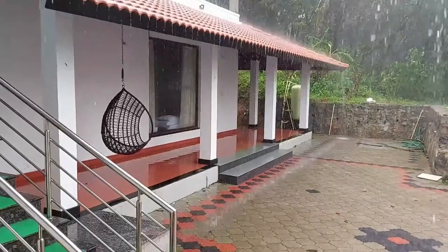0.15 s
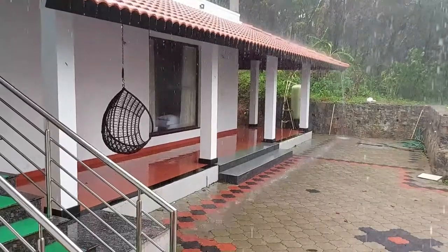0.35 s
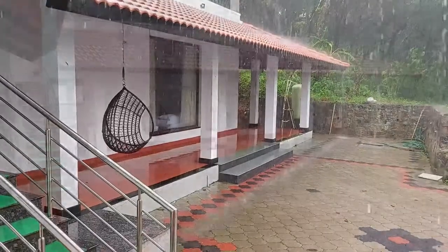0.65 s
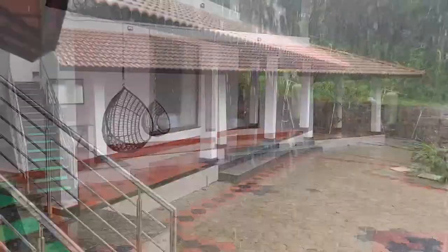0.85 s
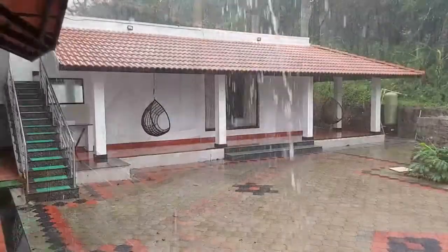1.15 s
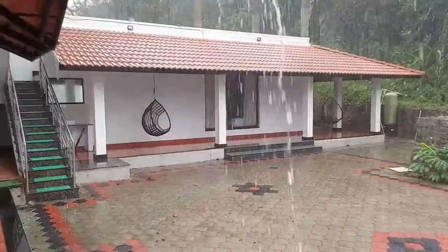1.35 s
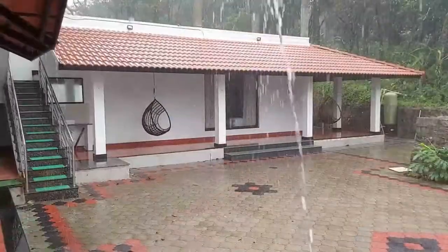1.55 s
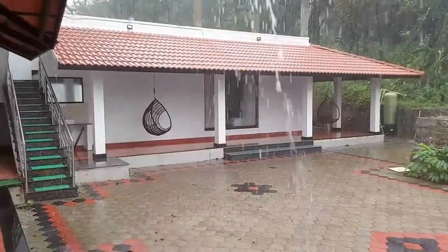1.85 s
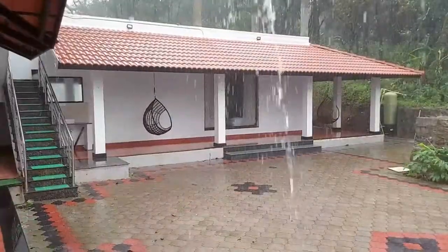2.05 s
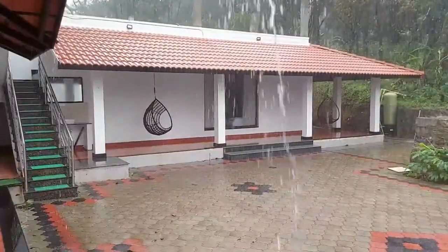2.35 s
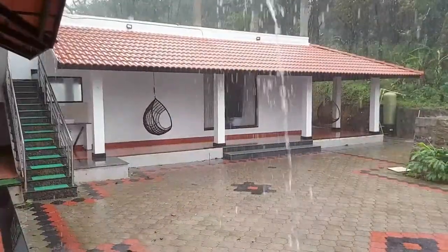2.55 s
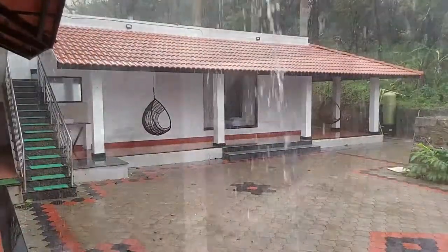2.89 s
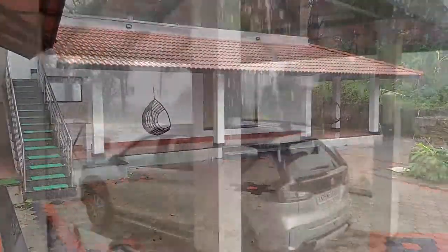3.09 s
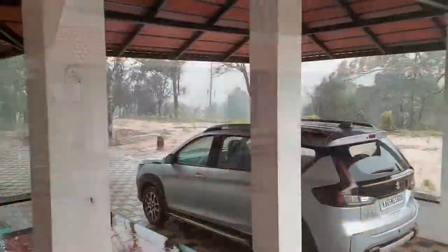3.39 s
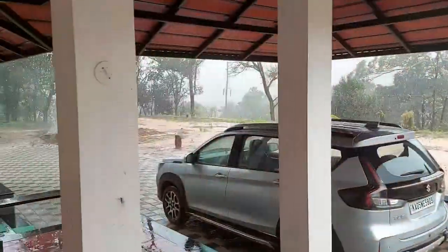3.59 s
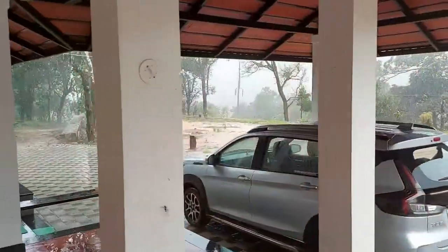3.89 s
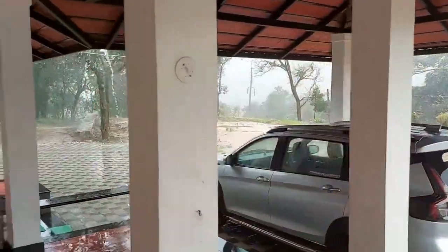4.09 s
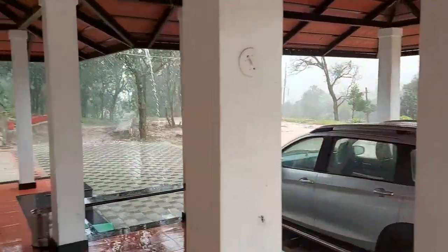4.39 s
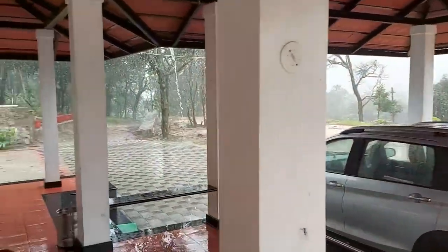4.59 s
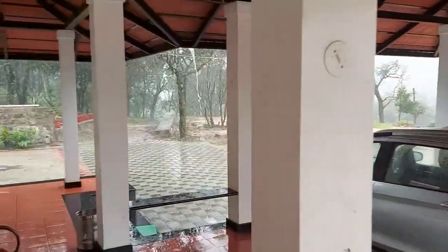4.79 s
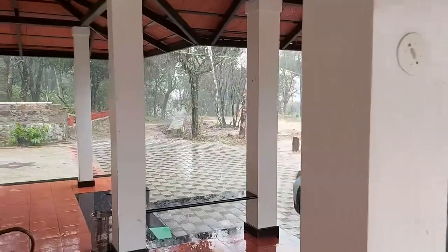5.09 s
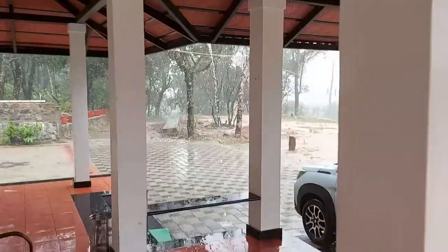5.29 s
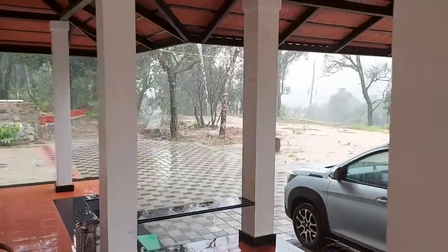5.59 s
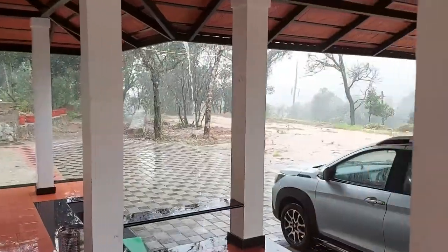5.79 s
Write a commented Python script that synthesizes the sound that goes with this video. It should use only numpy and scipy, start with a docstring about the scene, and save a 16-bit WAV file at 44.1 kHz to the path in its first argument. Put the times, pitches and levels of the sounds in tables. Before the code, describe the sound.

Dense steady monsoon rain beside a veranda cuts briefly to silence, then splashy roof runoff in a windy yard melts into a dripping porch.

```python
"""Dense, even monsoon rain beside a veranda; the sound sinks and drops out briefly, and the scene changes to a
paved yard that melts into a tiled porch. Noise stands for the wash of countless far drops; nearer drops are
short rings and sprays of noise at random times. Roof water splats in the yard; drips plink into puddles round
the porch, and tiles knock overhead. After the silence, gusts of low noise buffet the two microphones of a
phone, a hand's width apart."""
import sys
import numpy as np
from scipy import signal
from scipy.fft import rfft, irfft
from scipy.io import wavfile
from scipy.ndimage import uniform_filter1d

SR = 44100
rng = np.random.default_rng(int(sys.argv[2]) if len(sys.argv) > 2 else 0)


def unload_wav(signal):
    """Save mono or channel-first audio to the path in sys.argv[1] as 16-bit WAV at rate SR, clipped to [-1, 1]."""
    wavfile.write(
        sys.argv[1],
        SR,
        np.round(np.clip(np.atleast_2d(signal).T, -1, 1) * 32767).astype(np.int16),
    )


N = 261954
TIME = np.arange(N) / SR
FREQ = np.arange(N // 2 + 1) * SR / N
PORT_LAG_S = .00043  # travel time of sound from one microphone to the other


def veranda(far, near):
    """Dense, even rain on the paving, which surges once."""
    # Colour of the rain beside the veranda. Each row: frequency in Hz, relative level in dB.
    veranda_colour = [(30, -17), (50, -8), (85, 0.5), (160, -2.5), (380, -6), (560, -4.5), (800, -5.5),
                      (1200, -6.5), (1900, -5.5), (4200, -5), (5600, -7.5), (7000, -7.5), (8500, -11),
                      (15000, -11.5)]
    # Lean of the sound. Each row: frequency in Hz, left minus right in dB.
    veranda_lean = [(300, 0), (1300, 2), (2300, -3), (4400, -2.5), (6500, -4), (8500, 2.5), (11000, -2.5),
                    (15000, -3)]
    downpour = rain(far + undb(-7.0) * near, veranda_colour, level_db=-26.5)
    return lean(downpour, veranda_lean) * swell(centre_s=0.59, width_s=0.064, db=1.5)


def yard(far, near):
    """Coarser rain, with a rope of roof water breaking on the stones."""
    # Colour of the rain in the yard. Each row: frequency in Hz, relative level in dB.
    yard_colour = [(80, -7), (300, -4), (450, -7), (750, -4.5), (1250, -6), (1650, -3.5), (2100, -1.0),
                   (2500, -4.5), (2950, -3), (3800, -4), (5600, -7), (7000, -6.5), (8300, -11),
                   (15000, -11)]
    # Lean of the sound. Each row: frequency in Hz, left minus right in dB.
    yard_lean = [(300, -1), (1400, 2), (2100, -1), (3000, -7), (4400, -4), (6300, -0.5), (8500, 5),
                 (11000, 6), (15000, -0.5)]
    # Biggest splats from the eaves. Each row: start in seconds, relative peak in dB, ring in Hz.
    big_splats = [(1.0944, -22, 3420), (1.1722, -19, 2040), (1.1987, -20, 3830), (1.2803, -15, 2850),
                  (1.3277, -13.5, 2900), (1.3897, -14.5, 2900), (1.4591, -22, 2210), (1.5324, -15, 3170),
                  (1.701, -19, 2840), (1.7404, -13.5, 2120), (1.7943, -13, 2960), (1.8687, -15.5, 1990),
                  (1.9758, -10, 4350), (2.0552, -13, 2360), (2.0981, -16, 2670), (2.3334, -21, 2990),
                  (2.3808, -15.5, 3000), (2.6857, -13, 2930), (3.025, -16, 3000)]

    # the spatter slackens once
    flow = swell(centre_s=2.2, width_s=0.059, db=-8.5)
    rope = bubbles(rate=110, cycles=3.8, low_hz=1790, high_hz=4450)
    drops = flow * (undb(0.5) * near + undb(-12.0) * rope)

    big = undb(3.5) * splashes(big_splats, cycles=2.6, crack_db=-4, rebound_db=-17, bearing=0.046)
    small = flow * splashes(lesser_splats(), cycles=2.5, crack_db=2, rebound_db=-23, bearing=0.054)
    runoff = echo(big + small, wet_db=-2, t60_s=0.046)
    return lean(rain(far + drops, yard_colour, level_db=-28) + runoff, yard_lean)


def porch(far, near):
    """Rain beyond the pillars and on the tiles overhead; drips plink into puddles and ring under the roof."""
    # Colour of the rain from the porch. Each row: frequency in Hz, relative level in dB.
    porch_colour = [(60, -29), (150, -20), (230, -1.5), (380, -3), (550, 0.5), (800, -4), (1200, -7),
                    (1800, -3), (2900, -4.5), (3800, -1.4), (5800, -6.5), (7000, -6), (8300, -10),
                    (15000, -9.5)]
    # Lean of the sound. Each row: frequency in Hz, left minus right in dB.
    porch_lean = [(300, 0.17), (2400, -0.43), (15000, -0.12)]
    # Drips into the puddles. Each row: start in seconds, relative peak in dB, ring in Hz.
    drip_rows = [(3.6436, -18, 4440), (3.8032, -10.5, 3700), (3.967, -14, 4230), (4.335, -18, 3660),
                 (4.4388, -19, 1740), (4.8997, -11.5, 3750), (5.4513, -11, 5480), (5.5318, -18, 3450),
                 (5.6879, -21.5, 1310), (5.878, -21, 3920)]

    puddles = bubbles(rate=170, cycles=13, low_hz=1416, high_hz=6100)
    drops = echo(undb(-.5) * near + undb(-12) * puddles, wet_db=0.5, t60_s=0.06)
    outside = rain(far + drops, porch_colour, level_db=-30)

    drips = undb(2.0) * splashes(drip_rows, cycles=5.3, crack_db=-8, rebound_db=-9.5, bearing=.45)
    drips = echo(drips, wet_db=-3, t60_s=.16)
    return lean(outside + drips + undb(-46.0) * roof(), porch_lean)


def splashes(rows, cycles, crack_db, rebound_db, bearing, crack_s=0.00054):
    """Big drops: a crack and a short ring, then a smaller drop a moment away."""
    out = np.zeros((2, N))
    t = np.arange(SR // 50) / SR
    for start, db, hz in rows:
        crack = undb(crack_db) * rng.standard_normal(len(t)) * np.exp(-t / crack_s)
        hit = ring(hz, cycles) + crack
        # the hit falls a millisecond after the listed start
        add(out, start + 0.001026, undb(db) * hit / np.abs(hit).max(), bearing)
        # the smaller drop: delay in seconds, pitch as a ratio
        delay, pitch = rng.uniform((.002, .75), (.005, 1.3))
        add(out, start + delay, undb(db + rebound_db) * ring(hz * pitch, cycles), bearing)
    return out


def lesser_splats(per_s=7.8, mean_db=-16.5, spread_db=3.5, mid_hz=2800, spread_octaves=0.14):
    """Smaller lumps of roof water at random times: rows of start in s, relative peak in dB, ring in Hz."""
    count = int(per_s * N / SR)
    size, pitch = rng.standard_normal((count, 2)).T
    start = rng.random(count) * N / SR
    return zip(start, mean_db + spread_db * size, mid_hz * 2 ** (spread_octaves * pitch))


def patter(rate, spread_db, cycles, count=10):
    """Drops that ring for a moment, each size at its own pitch; level per Hz about even."""
    out = 0
    for hz in np.geomspace(1600, 12500, count):
        hits = impacts(rate / count, spread_db)
        drops = signal.oaconvolve(hits, ring(hz, cycles)[None], axes=1)[:, :N]
        out = out + unit(drops) * np.sqrt(hz)
    return unit(out)


def ticks(rate, spread_db, burst_s=0.0008, count=9):
    """Drops bursting on stone: very short sprays of noise, thin in the bass."""
    t = np.arange(SR // 150) / SR
    out = 0
    for burst in rng.standard_normal((count, len(t))) * np.exp(-t / burst_s):
        hits = impacts(rate / count, spread_db)
        out = out + signal.oaconvolve(hits, unit(burst)[None], axes=1)[:, :N]
    return unit(signal.lfilter(*signal.butter(1, 1400, "high", fs=SR), out))


def impacts(rate, spread_db, own_db=3):
    """Random hits from all directions; the few that land near are louder than the rest."""
    when, near, bearing, tilt = rng.random((int(rate * N / SR), 4)).T
    size = undb(-spread_db * np.log(near + .02))
    # alternate the sign so that the hits do not pile up into an offset
    size = size * (-1) ** np.arange(len(size))
    out = np.zeros((2, N))
    for channel, sign in enumerate((1, -1)):
        lag = sign * (bearing - .5) * PORT_LAG_S * SR
        at = (when * N + lag).astype(int) % N
        out[channel] = np.bincount(at, size * undb(sign * own_db * (2 * tilt - 1)), N)
    return out


def ring(hz, cycles, glide=0.023):
    """The small air pocket under a drop: a few dying cycles that rise in pitch."""
    turns = np.arange(SR // 50) / SR * hz
    bend = 1 + glide * np.tanh(turns / cycles / 2)
    return np.exp(-turns / cycles) * np.sin(2 * np.pi * turns * bend)


def bubbles(rate, cycles, low_hz, high_hz):
    """Drops in water trap bubbles that ring, each at its own pitch."""
    out = np.zeros((2, N))
    for when, pitch, size, bearing in rng.random((int(rate * N / SR), 4)):
        hz = low_hz * (high_hz / low_hz) ** pitch
        add(out, when * N / SR, size ** 2 * hz * ring(hz, cycles), 2 * bearing - 1)
    return unit(out)


def roof(rate=900, low_hz=380, high_hz=680, count=5):
    """Drops knock on the clay tiles overhead, at a handful of dull notes that come and go."""
    out = 0
    for hz in np.geomspace(low_hz, high_hz, count):
        hits = impacts(rate / count, 7.7, own_db=0.5)
        knocks = signal.oaconvolve(hits, ring(hz, 1.8)[None], axes=1)[:, :N]
        out = out + hz * unit(knocks) * undb(2.1 * walk(11))
    return unit(out)


def wash():
    """Far drops from all round, as noise: alike in both microphones only at long wavelengths."""
    likeness = .9 * np.sinc(2 * FREQ * PORT_LAG_S)
    mid, side = rng.standard_normal((2, N))
    side = shape(side, np.sqrt((1 - likeness) / (1 + likeness)))
    return np.array([mid + side, mid - side])


def flicker(x, depth_db, rate=25, count=10):
    """The mix of drop sizes keeps shifting, so each part of the spectrum swells on its own."""
    # position of each frequency along the overlapping bands
    place = np.interp(np.log(FREQ + 1), np.log([350, 12000]), [0, count - 1])
    spectrum, out = rfft(x), 0
    for band in range(count):
        share = np.maximum(1 - np.abs(place - band), 0)
        out = out + irfft(spectrum * share, N) * undb(depth_db * walk(rate))
    return out


def rain(sound, colour, level_db):
    """Give the rain the colour and the strength that it has at one place."""
    bass_cut = FREQ / np.hypot(FREQ, 40)
    sound = shape(sound, undb(contour(colour)) * bass_cut)
    return sound / np.std(sound.mean(axis=0)) * undb(level_db)


def echo(x, wet_db, t60_s):
    """Walls, floor and roof smear each drop into a short tail of decaying noise."""
    t = np.arange(SR // 4) / SR
    tail = rng.standard_normal((2, len(t))) * undb(-60 * t / t60_s) * (t > .002)
    tail = tail / np.sqrt(np.sum(tail ** 2) / 2)
    return x + undb(wet_db) * signal.oaconvolve(x, tail, axes=1)[:, :N]


def wind(breeze, flutter_db=0.24, shared=0.11, lean_db=-1.0):
    """Eddies thump the two microphones, mostly each on its own; gusts rise out of a light breeze."""
    # Gusts. Each row: time of full strength in seconds, length before release in seconds, relative level in dB.
    gust_rows = [(0.948, 0.019, -39.5), (1.126, 0.34, -30.5), (1.582, .05, -34), (1.76, 0.048, -35),
                 (1.876, 0.073, -36), (2.017, .1, -38.5), (2.538, 0.48, -47), (3.07, .06, -37.5),
                 (3.87, 0.14, -36.5), (4.08, 0.18, -37.5), (4.368, 0.19, -37.5), (4.75, 0.043, -40.5),
                 (4.96, 0.09, -44), (5.818, .06, -48)]
    # Colour of the eddies. Each row: frequency in Hz, relative level in dB.
    eddy_colour = [(20, -40), (30, -27), (45, -7), (72, 0.5), (130, -4), (180, -11.5), (260, -17),
                   (400, -27.5), (900, -40.5)]
    # every gust hits quickly, sags while it blows and lets go
    attack_s, sag_db_per_s, release_s = 0.019, -21.5, 0.036

    power = breeze ** 2
    for start, length, db in gust_rows:
        age = np.maximum(TIME - start, 0)
        attack = ramp(start - attack_s, start)
        release = np.exp(-np.maximum(age - length, 0) / release_s)
        power = power + (attack * undb(db + sag_db_per_s * age) * release) ** 2

    own = rng.standard_normal((2, N))
    eddies = shape(own + shared * own[::-1], undb(contour(eddy_colour)))
    eddies = eddies / np.std(eddies.mean(axis=0)) * undb(lean_db * np.array([[.5], [-.5]]))
    return eddies * np.sqrt(power) * undb(flutter_db * walk(24.97))


def undb(db):
    """Decibels to gain."""
    return 10 ** (np.asarray(db) / 20)


def unit(x):
    """Scale to an rms of one."""
    return x / np.sqrt(np.mean(x ** 2))


def contour(rows):
    """dB at every frequency from (Hz, dB) rows."""
    hz, db = np.transpose(rows)
    return np.interp(np.log(FREQ + 1), np.log(hz), db)


def shape(x, gain):
    """Filter by a gain for every frequency."""
    return irfft(rfft(x) * gain, N)


def lean(x, rows):
    """Tip each frequency towards the left or the right."""
    return shape(x, undb(np.outer([.5, -.5], contour(rows))))


def add(out, start, sound, bearing):
    """Lay a sound into both channels; it reaches the farther microphone later."""
    for channel, sign in enumerate((1, -1)):
        i = max(int((start + sign * bearing * PORT_LAG_S / 2) * SR), 0)
        part = out[channel, i:i + len(sound)]
        part += sound[:len(part)]


def walk(rate):
    """Random levels held 1 / rate s and smoothed twice; spread near one."""
    k = int(SR / rate)
    steps = np.repeat(rng.standard_normal(N // k + 2), k)
    smooth = uniform_filter1d(uniform_filter1d(steps, k), k)
    return 1.68 * smooth[k // 2:k // 2 + N]


def ramp(start, end):
    """Rise evenly from nothing to one between two times in seconds."""
    return np.clip((TIME - start) / (end - start), 0, 1)


def swell(centre_s, width_s, db):
    """Gain of a smooth, passing change in the flow."""
    return undb(db * np.exp(-((TIME - centre_s) / width_s) ** 2))


def scene():
    """The three places in turn: a brief silence after the first, then the yard melts into the porch."""
    far = flicker(wash(), depth_db=0.97)
    near = undb(-4) * patter(rate=1700, spread_db=5.0, cycles=1.0)
    near = near + undb(-1.0) * ticks(rate=900, spread_db=5.0)
    # the nearer drops come in uneven sheets
    near = near * undb(.8 * walk(18))

    # the sound sinks towards the silence and rises again after it
    stop, resume = .886, .937  # s
    fade_out_s, fade_in_s, fade_db = 0.17, 0.16, -4.8
    dying = np.exp(-np.maximum(TIME - stop, 0) / .003)
    at_veranda = undb(fade_db * ramp(stop - fade_out_s, stop)) * dying
    # the yard dies away while the porch comes up
    in_yard = undb(fade_db * (1 - ramp(resume, resume + fade_in_s))) * (1 - ramp(2.98, 3.48))
    in_porch = ramp(2.89, 3.53)

    # light air between the gusts, weaker under the porch
    breeze = in_yard ** 2 * undb(-44) + in_porch * undb(-52)
    # shifted by half the length, so that other drops fall round the porch than in the yard
    sheltered = porch(*np.roll([far, near], N // 2, axis=-1))
    later = in_yard * yard(far, near) + in_porch * sheltered + wind(breeze)
    return at_veranda * veranda(far, near) + later * (TIME > resume)


def record(dry):
    """The phone cuts the top, steeply above 15.9 kHz."""
    top_cut = signal.ellip(12, .1, 80, 15900, fs=SR, output="sos")
    return signal.sosfilt(top_cut, dry)


dry = scene()
out = record(dry)
unload_wav(out)
```